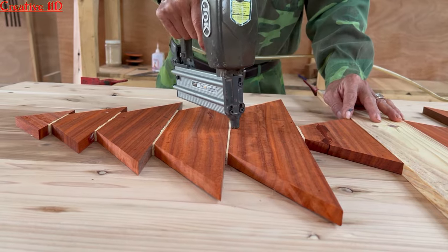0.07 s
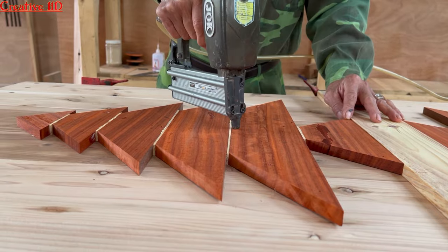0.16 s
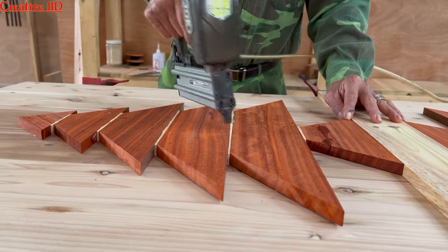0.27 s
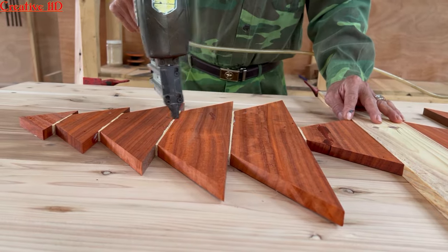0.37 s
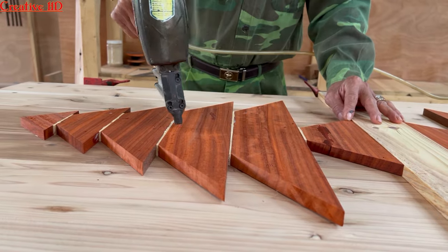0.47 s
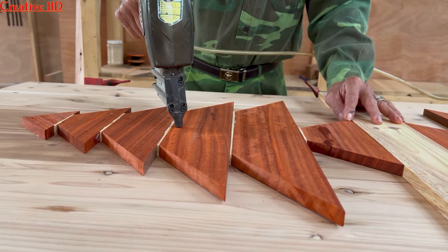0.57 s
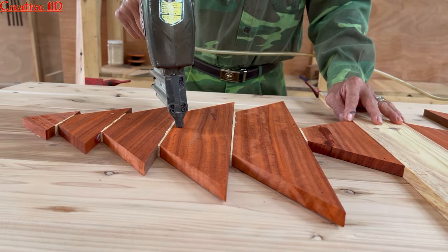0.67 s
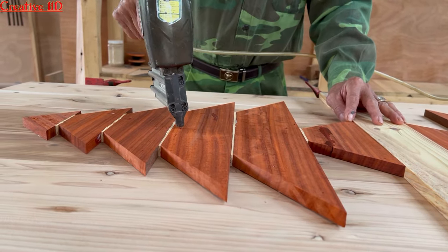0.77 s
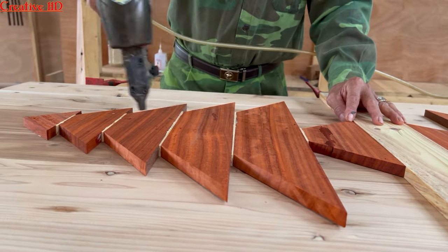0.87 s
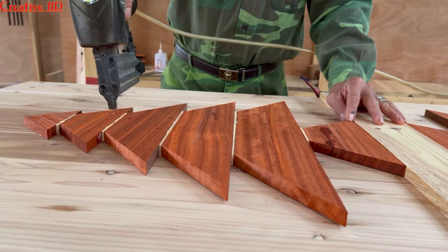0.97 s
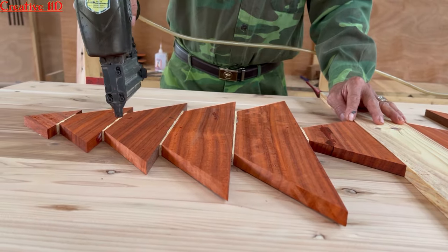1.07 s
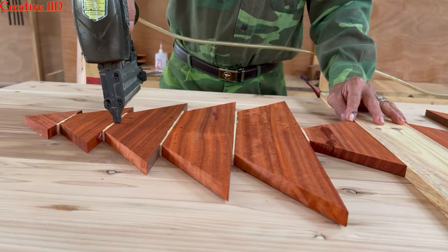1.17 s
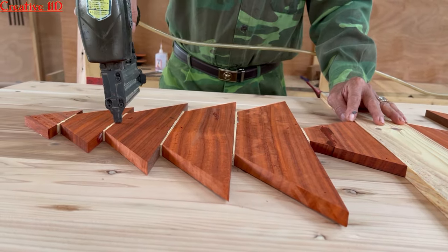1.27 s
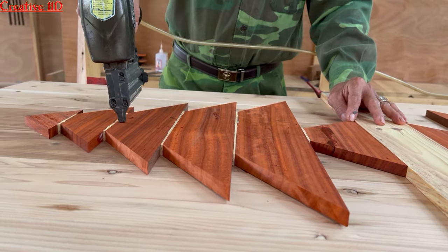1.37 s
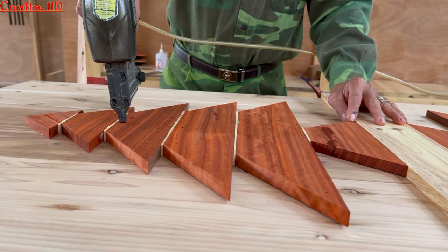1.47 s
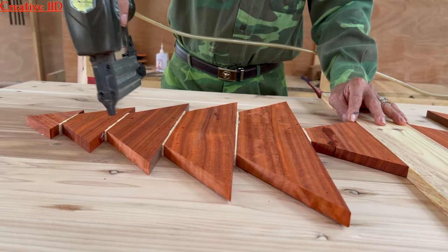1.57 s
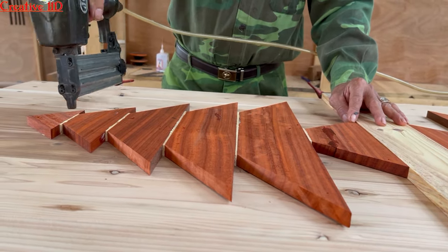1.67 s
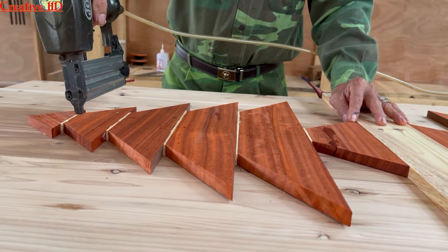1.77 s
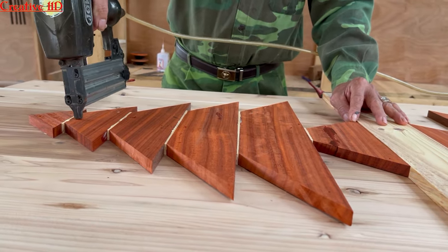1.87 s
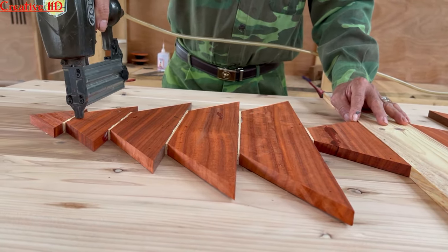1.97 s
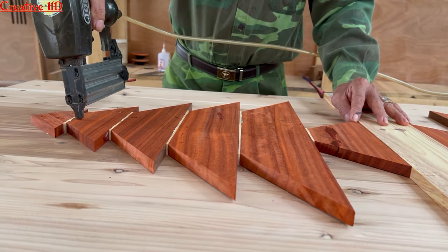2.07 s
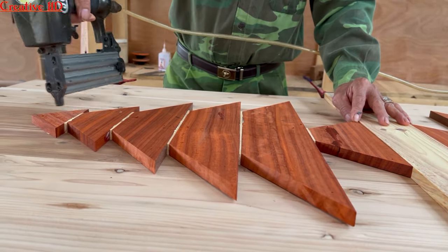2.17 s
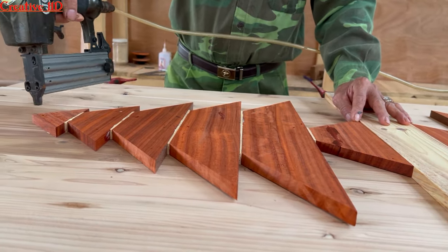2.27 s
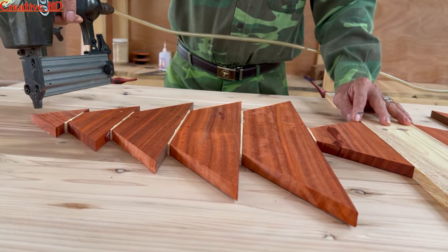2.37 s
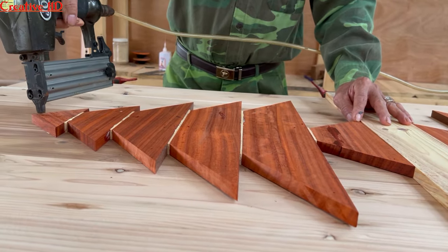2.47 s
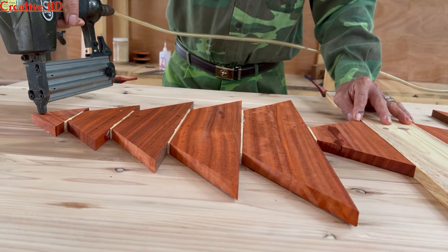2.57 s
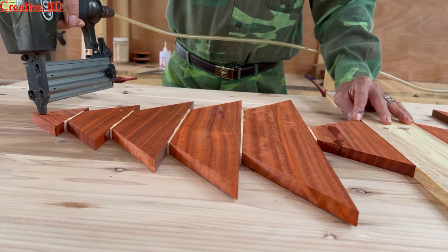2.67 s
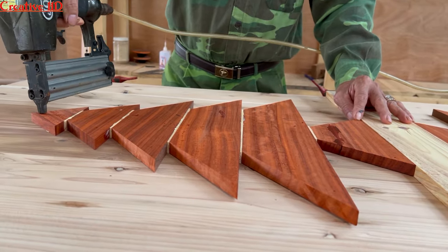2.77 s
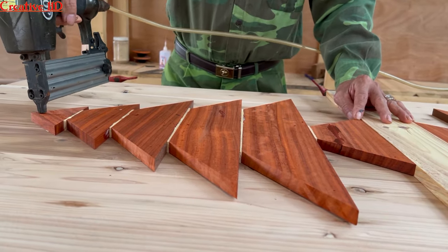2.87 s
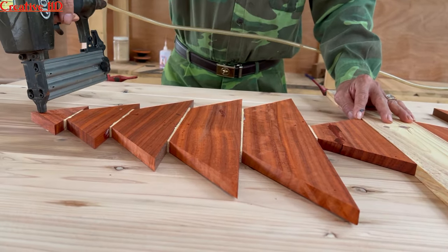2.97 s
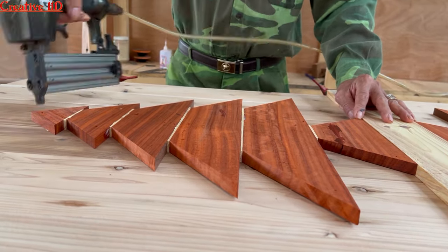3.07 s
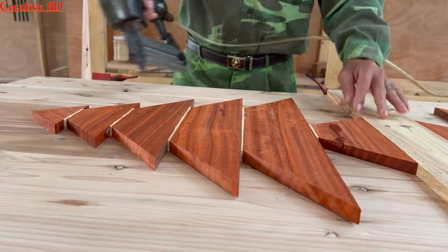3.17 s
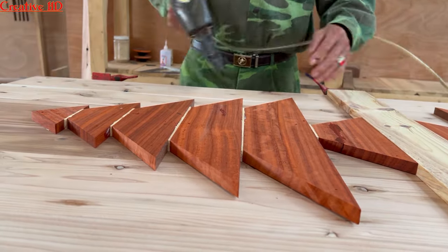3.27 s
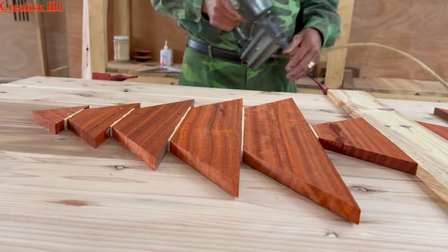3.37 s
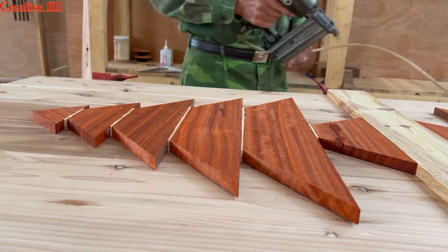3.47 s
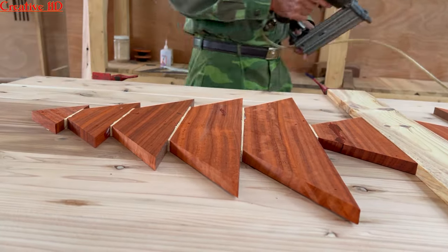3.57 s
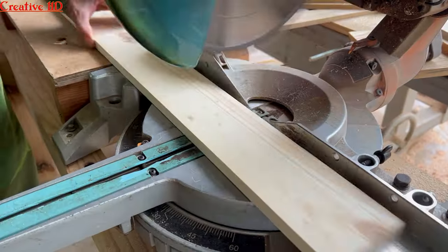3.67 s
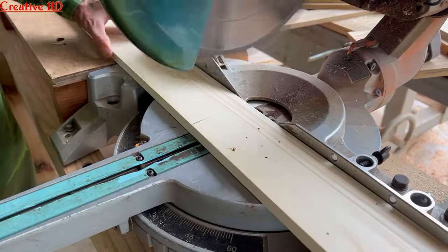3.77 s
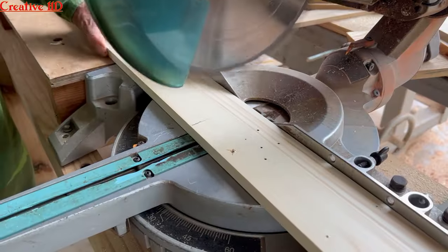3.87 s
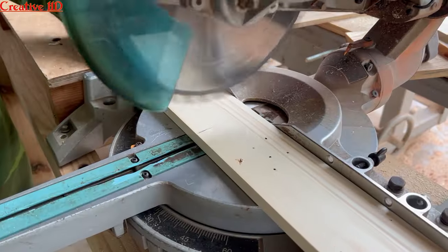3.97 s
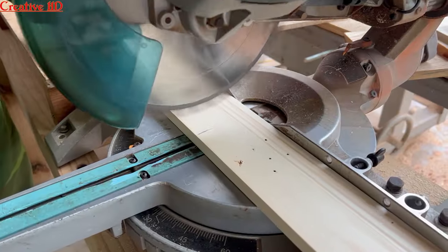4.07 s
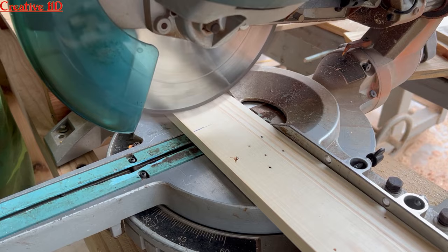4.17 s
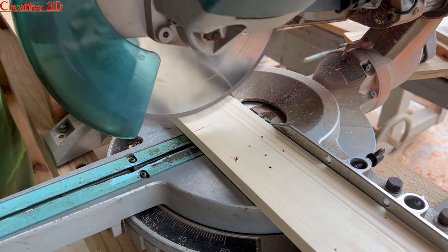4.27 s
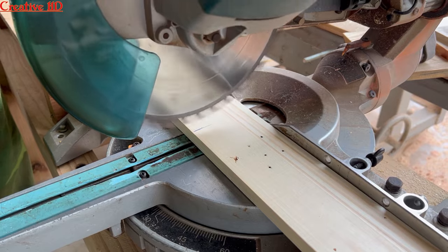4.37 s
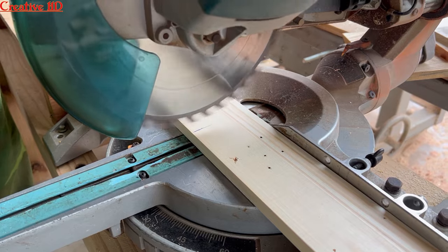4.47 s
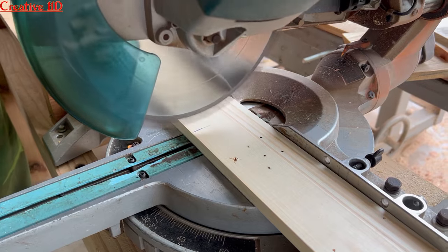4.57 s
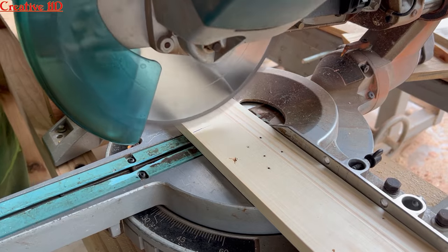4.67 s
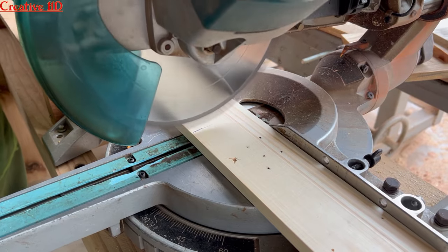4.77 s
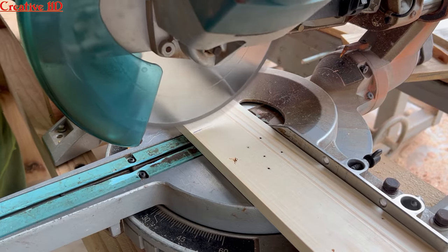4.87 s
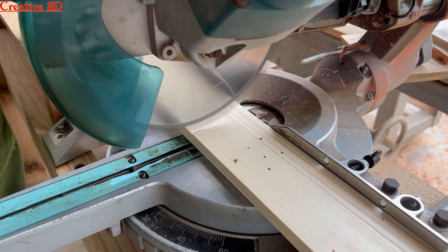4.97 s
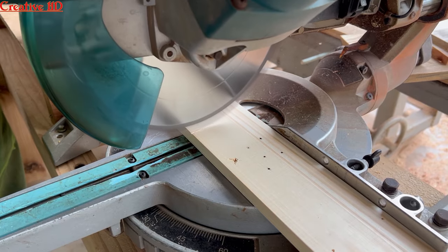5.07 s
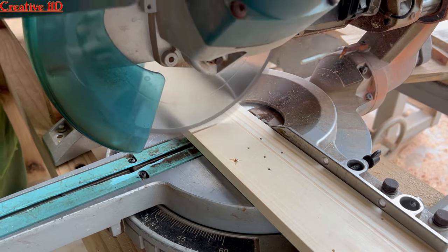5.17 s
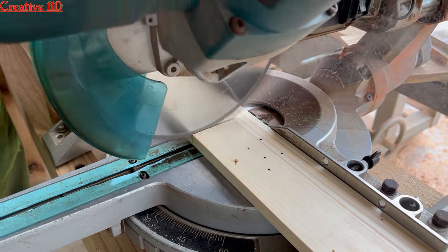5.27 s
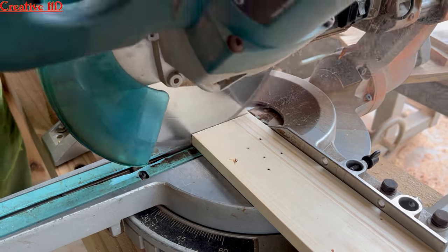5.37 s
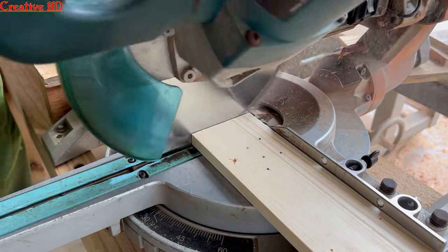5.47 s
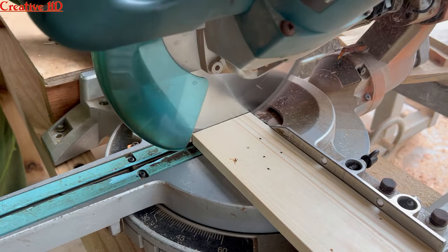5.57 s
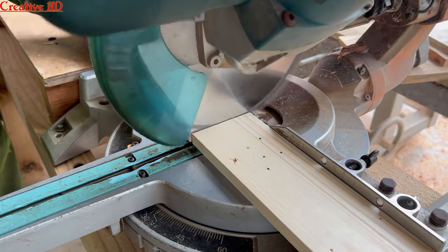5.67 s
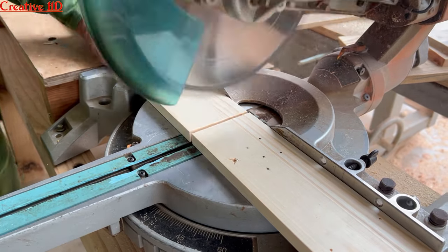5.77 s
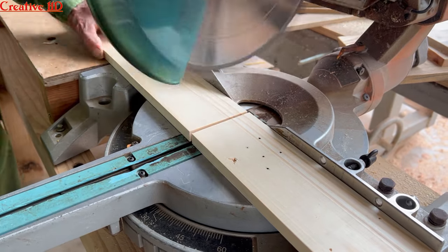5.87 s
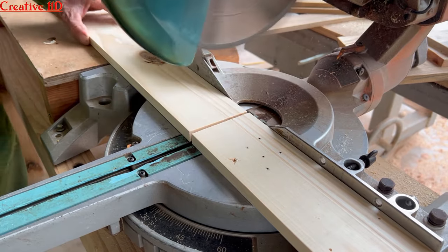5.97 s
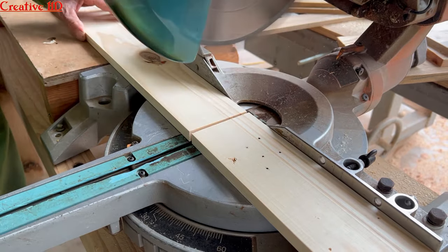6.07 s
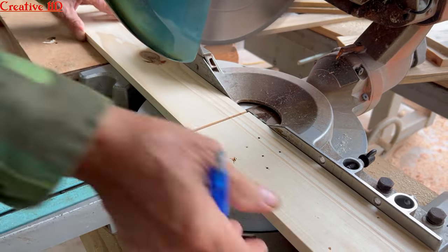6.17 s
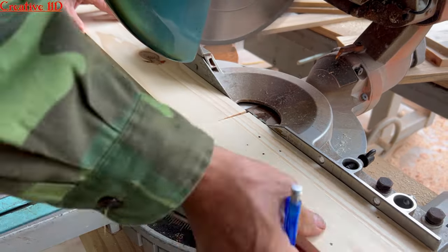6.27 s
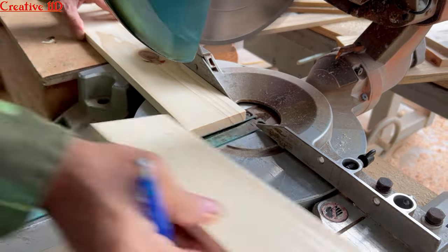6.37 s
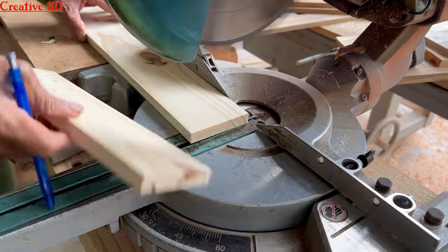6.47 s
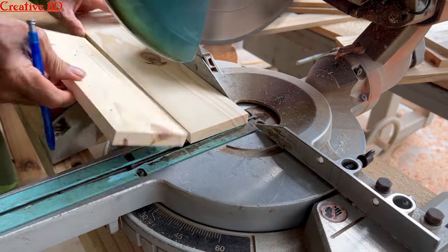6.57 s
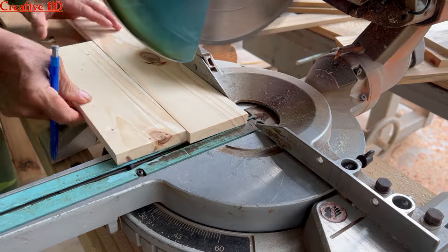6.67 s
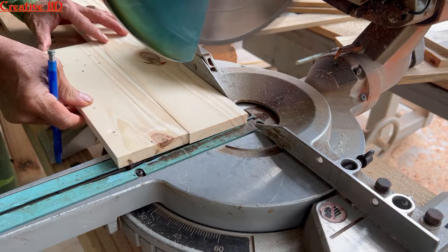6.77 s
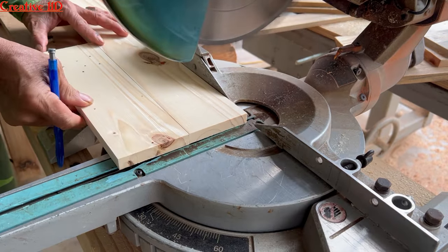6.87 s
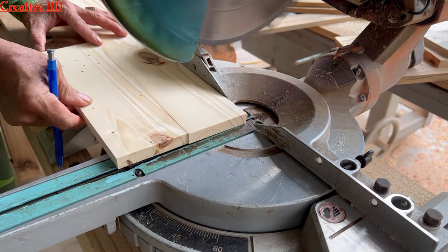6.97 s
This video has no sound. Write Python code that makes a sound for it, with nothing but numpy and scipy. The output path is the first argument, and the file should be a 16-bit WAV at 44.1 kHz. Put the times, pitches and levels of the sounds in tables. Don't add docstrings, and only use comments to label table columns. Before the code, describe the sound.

Close stereo phone pickup in a workshop with quiet background air and short reverberation. A pneumatic nailer fires at about 0.23, 0.79, 1.54, 2.08 and 3.04 s: a valve puff, a violent crack, then some 0.05 s later a bright exhaust burst and fading hiss, with low bench thuds and the tool dropping back. Soft wooden nose touches come between shots; very faint distant squeals appear around 0.5-1.5 s. At 3.67 s the place changes abruptly: a thin blade ring fades under small wooden ticks near 3.75 s. A switch clacks at 4.58 s and a mitre saw runs up to a piercing whine. Teeth meet wood at 5.05 s; the pitch sags slightly amid roaring, rasping hiss until 5.7 s. A clack at 5.8 s starts braking, the whine plunging and fading by about 6.4 s over faint blade ring. Pieces click and knock from 6.5 to 6.75 s, then quiet.

```python
import sys
import numpy as np
from scipy import signal
from scipy.fft import rfft, irfft, next_fast_len
from scipy.io import wavfile
from scipy.ndimage import uniform_filter1d, map_coordinates

SR = 44100
rng = np.random.default_rng(int(sys.argv[2]) if len(sys.argv) > 2 else 0)


def dump(signal):
    limited = np.clip(np.atleast_2d(signal).T, -1, 1)
    pcm = np.round(limited * 32767).astype(np.int16)
    wavfile.write(sys.argv[1], SR, pcm)


def amplitude_ratio(level_db):
    exponent = np.asarray(level_db, float) / 20
    return 10 ** exponent


N = 309565
T = np.arange(N) / SR
SCENE_CHANGE = 3.672
TOP_HZ = 15850
SWITCH_ON_S, CONTACT_S, THROUGH_S, BRAKE_S, STOP_S = 4.58, 5.05, 5.69, 5.786, 6.5
FREE_HZ = 5280

# start in seconds, puff in dB, leak in dB.
VALVES = [
    (0.219, -23, -27.5),
    (0.7756, -10.5, -28.5),
    (1.5285, -26.5, -29.5),
    (2.072, -20, -27.5),
    (3.02, -19, -28.5),
]
# start in seconds, peak in dB, rebound in dB.
BLOWS = [
    (.23, -5.5, -19),
    (0.7925, -2, -20.5),
    (1.5392, -5, -23),
    (2.082, -6, -21),
    (3.037, -3.5, -18),
]
# start in seconds, opening in dB, closing in dB, leak in dB.
EXHAUSTS = [
    (0.292, -7, -12, -37.5),
    (0.8319, -5.5, -8.5, -37.5),
    (1.594, -8, -8, -35.5),
    (2.1484, -7.5, -10, -34.5),
    (3.0987, -7.5, -8.5, -34),
]
# start in seconds, level in dB.
SEEPS = [
    (2.57, -68.5),
    (2.66, -69),
]
# delay after the event in seconds, body relative in dB, hold in seconds.
PUFF = (.0006, -5, .002)
BLOW = (.0006, -2, .0035)
REBOUND = (.011, 1, .005)
OPENING = (0.0013, -11.5, 0.0135)
SNAP = (0.00088, -4.5, 0.0024)
CLOSING = (.0125, -3.5, 0.0012)
# frequency in Hz, density in dB per Hz.
BLAST = [(1470, -33.5), (2500, -7.5), (4300, -6), (4990, -5.5), (8940, -4.5), (10600, -7), (11500, -1),
         (14700, -6.5), (16000, -10.5)]
BODY = [(180, -26), (300, -8.5), (999, -12), (1500, -14), (2300, -11), (3300, -15.5), (4300, -11),
        (6000, -27), (7800, -55.5), (13200, -120)]
LEAK = [(590, -35), (1000, -8.5), (1890, -7.5), (2680, -3), (3300, -5.5), (5200, -6), (7100, -13.5),
        (13300, 2.5), (16000, -7)]

# start in seconds, peak in dB.
STRIKES = [(.2345, -19), (.295, -20), (.7771, -17), (.794, -13), (.835, -15), (1.53, -37.5), (1.54, -24),
           (1.594, -21), (2.084, -11), (2.149, -13.5), (3.0214, -21.5), (3.037, -15.5), (3.099, -13.5)]
# start in seconds, peak in dB.
ROCKS = [
    (.343, -19),
    (.391, -22),
    (.879, -22.5),
    (1.626, -35),
    (1.639, -26.5),
    (2.118, -20),
    (2.209, -19),
    (3.155, -24),
]
# start in seconds, peak in dB.
LANDINGS = [
    (.4111, -16),
    (.922, -21.5),
    (1.706, -22),
    (2.2672, -14.5),
    (3.216, -16.5),
]
# softness in seconds, t60 in seconds, 1.25 times the last pitch in Hz.
STRIKE = (.001, .052, 95)
ROCK = (0.0041, 0.079, 95)
LANDING = (.001, 0.044, 51)

# start in seconds, peak in dB, click relative in dB.
TOUCHES = [
    (0.077, -29.5, -27),
    (0.575, -33.5, -30),
    (1.165, -26.5, -17.5),
    (1.896, -28, -28),
    (2.565, -46, -15.5),
    (3.497, -54, 0),
    (3.515, -43, -11.5),
]
# frequency in Hz, level in dB, t60 in seconds.
BOARD = [(300, -9, .17), (425, -1, .19), (515, 0, .13), (760, -5, .11), (860, -14, .1), (990, -17, .1),
         (1200, -14, .06)]
# start in seconds, peak in dB, pitch in Hz, click relative in dB.
TICKS = [(0.1704, -44.5, 2270, -19), (0.2207, -26, 1508, -3), (1.5291, -25, 7990, -5.5),
         (2.0707, -27, 7940, -6), (2.881, -53.5, 2400, -18.5), (3.516, -46.5, 790, -29.5),
         (3.53, -47.5, 790, -30), (3.635, -53, 1830, -13.5), (3.752, -36.5, 1030, -22),
         (3.7555, -32, 2610, -24), (3.7691, -34, 2150, -25.5), (3.773, -39.5, 704, -24.5),
         (3.78, -36, 2240, -19.5), (3.909, -43.5, 2275, -17.5), (4.174, -57.5, 7000, -3),
         (4.43, -60.5, 7950, -4.5), (4.466, -67, 8000, -4.5), (4.488, -67, 7000, -3.5),
         (4.535, -47, 1035, -0.5), (4.583, -25, 1520, -19.5), (4.591, -20, 1440, -25),
         (5.805, -18, 1340, -15), (5.811, -17.5, 1370, -15), (5.807, -24.5, 9700, -30),
         (5.815, -28, 9840, -31), (6.508, -39, 7680, -9), (6.526, -39.5, 2980, -2),
         (6.5393, -39, 3920, -12), (6.544, -46, 1290, -14), (6.561, -42.5, 3960, -3),
         (6.6384, -27, 3500, -19), (6.659, -36.5, 1120, -12.5), (6.665, -35.5, 780, -25),
         (6.676, -35, 1210, -25.5), (6.691, -36, 1100, -23), (6.673, -27.5, 2780, -27.5),
         (6.685, -30, 1520, -31.5), (6.698, -34.5, 770, -15.5), (6.7315, -31, 3760, -14),
         (6.733, -34.5, 1360, -23.5)]

# multiple of the main whine, level in dB, unsteadiness 0-1.
DRIVING = [(1, -1, .022), (2, 2.5, .026), (3, -4, .025)]
# multiple, level in dB, unsteadiness 0-1, heard from Hz, heard to Hz.
BRAKING = [(1, -37, .03, 1200, 3300), (2, -34, .02, 2750, 8500), (2, -40, .03, 1930, 2080),
           (4, -42, .01, 2600, 13000), (8, -41, .006, 4400, 5500)]
# frequency in Hz, gain in dB.
HOUSING = [(600, -22), (1400, -1), (2000, 5), (2500, -2), (3100, -5), (3750, 5), (4200, -1), (4800, 5),
           (5250, 3), (5800, -4), (6600, 3), (7800, -7), (8700, -1), (10000, -7), (12500, -5), (14800, 1)]
# frequency in Hz, gain in dB.
GUARD = [(600, -4), (1250, 0), (1650, -4), (2000, 2), (2400, -10), (2850, 0), (3250, -7), (3650, 7),
         (4900, 3), (5700, -9), (6600, -1), (8000, -3), (11000, -6), (16000, -20)]
# level in dB, dB per octave of speed when driven, the same when braking,
# change once through the wood in dB, change once braked in dB, gain at full bite in dB.
ROAR_LAW = (-28.5, 4, 10, 0, -1, 2.5)
CUT_LAW = (-24, 7.5, 8.5, -3.5, -1.5, 2.5)
WHINE_LAW = (3, 0, -20, 0, -1)
# peak in seconds, peak in dB, rise in dB per second, fall in dB per second.
GROWL = [
    (4.6, -54.5, 302.7, 30),
    (4.7, -34, 40, 90),
]
# as the growl, then frequency in Hz.
RASP = [
    (4.98, -28.5, 70, 61, 3730),
    (5.17, -31.5, 54, 60, 5800),
    (5.3, -33, 40, 35, 5250),
    (5.65, -24, 54, 250, 5250),
    (5.53, -35, 120, 120, 8750),
]
# frequency in Hz, level in dB.
SINGING = [(4883, -30), (5281, -38), (6460, -33), (6724, -44), (7257, -40), (8979, -42), (9771, -42),
           (9900, -43), (10347, -41), (10541, -41), (11908, -42), (12016, -44), (12796, -39), (13324, -45),
           (13609, -44), (15434, -40), (15720, -41)]
# frequency in Hz, density in dB per Hz.
ROAR = [(120, -55), (200, -23), (418, -16.5), (512, -15), (594, -16), (665, -8.5), (1070, 0), (1800, -8.5),
        (3000, -7.5), (3900, -18.5), (6600, -120)]
CUT = [(880, -44.5), (1500, -10), (1810, -20), (2740, -8.5), (4000, -3.5), (5020, 1), (5880, -4),
       (6630, -7.5), (8080, -9.5), (10100, -8.5), (11200, -10), (12400, -11.5), (16000, -14)]

# frequency in Hz, level in dB.
RINGING = [(2250, -60), (2277, -56.5), (3042, -67.5), (3079, -71.5), (3618, -80), (3801, -72.5),
           (3930, -77), (4091, -74), (4151, -74.5), (6406, -99), (6438, -103), (6471, -101), (6821, -107),
           (7887, -118)]
# frequency in Hz, level in dB.
RINGING_LATE = [(1880, -68.5), (2627, -74.5), (3618, -67.5), (3898, -67.5), (4054, -70), (4145, -64),
                (6508, -71.5), (6546, -74), (7359, -83.5), (8210, -83.5)]
# frequency in Hz, level in dB.
DRONE = [(150, -2), (175, -4), (200, -1.5)]
# peak in seconds, peak in dB, rise in dB per second, fall in dB per second.
EARLY_RING = [
    (3.672, -56, 1, 9.5),
    (3.672, -61.5, 1, 5.5),
]
LATE_RING = [
    (5.9, -56.5, 150, 15),
    (6.2, -52, 12, 20),
]
HUM = [
    (4.9, -49, 26.6, 36),
    (5.97, -50, 44.5, 14),
    (6.4, -79, 36.13, 17),
]

# start in seconds, end in seconds, pitch in Hz, glide in Hz per second, level in dB.
SQUEALS = [
    (0.49, 0.717, 1190, -170, -67.5),
    (0.589, 0.706, 2370, -700, -71),
    (0.898, 1.527, 2680, 570.5, -75.5),
]
# peak in seconds, peak in dB, rise in dB per second, fall in dB per second.
BENCH_SWELLS = [
    (.5, -64, 1, 0.96),
    (1.5, -65, 35, 20),
]
SAW_SWELLS = [
    (3.67, -57.5, 1, 1),
    (5.2, -51, 26, 2.6),
    (6.8, -53, 73, 22.6),
]
# frequency in Hz, density in dB per Hz.
BENCH_AIR = [(35, -62.5), (60, -24.5), (90, -8), (200, -3.5), (320, -13.5), (520, -11.5), (850, -15),
             (1600, -21.5), (3000, -21.5), (7000, -35.5), (12500, -27.5), (16000, -33.5)]
SAW_AIR = [(47, -28), (80, 0), (156, -0.5), (404, -18), (615, -14.5), (751, -20), (2270, -17),
           (3240, -22.5), (4050, -19), (13100, -46), (16000, -54)]
# frequency in Hz, t60 in seconds.
SHOP = [(100, 0.96), (500, 0.35), (2000, 0.45), (6000, 0.21), (14000, 0.11)]
# frequency in Hz, then likeness 0-1, left-right in dB, or left lead in radians.
AT_BENCH = [
    [(100, 0.99), (600, 1), (2000, 0.88), (5000, 0.36), (15000, 0.25)],
    [(60, -0.5), (150, -1), (380, -0.5), (950, -2), (2380, -3), (5980, -2.5), (15000, -4)],
    [(0, 0), (2500, 0.5), (5680, -1.3), (8010, 1), (12300, -3), (14700, -9), (16700, -3.5)],
]
AT_SAW = [
    [(100, .98), (600, .85), (2500, .85), (4000, .12), (5200, .55), (8000, .58), (10000, .45), (15000, .5)],
    [(100, -1), (700, -3.5), (1400, -5), (2750, -.5), (4100, 1), (5500, -1), (6400, -5), (8200, -4.5), (10000, -10), (12000, -6), (15000, -4.5)],
    [(0, 0), (700, -.35), (3100, -.25), (4000, -3), (4800, -4), (6500, -6.2), (9000, -6.8), (12400, -6), (14600, -7.7)],
]


def air():
    sharp, body, leak, valve = np.zeros((4, N))
    t = T[:SR // 2]
    bursts = [(s, db, PUFF) for s, db, _ in VALVES]
    for s, db, rebound_db in BLOWS:
        bursts += [(s, db, BLOW), (s, rebound_db, REBOUND)]
    for s, db, closing_db, _ in EXHAUSTS:
        bursts += [(s, db, OPENING), (s, db + 0.5, SNAP), (s, closing_db, CLOSING)]
    for s, db, (after, body_db, hold) in bursts:
        shape = (1 - np.exp(-t / 0.00027)) * amplitude_ratio(-60 * np.clip(t - hold, 0, 1) / 0.013)
        add(sharp, s + after, amplitude_ratio(db - 13) * shape)
        add(body, s + after, amplitude_ratio(db + body_db - 7.5) * shape)

    for s, *_, db in VALVES + EXHAUSTS + SEEPS:
        add(leak, s, amplitude_ratio(db - 60 * t / .4))
    lead_s = 0.012
    to_go = lead_s - T[:round(lead_s * SR)]
    for s, _, db in VALVES:
        add(leak, s - lead_s, amplitude_ratio(db - 11 - 2000.5 * to_go))
        add(valve, s, amplitude_ratio(db - 1.5 - 60 * t / .09))

    flutter = amplitude_ratio(2.6 * wobble(700))
    jets = flutter * (sharp * noise(BLAST) + body * noise(BODY))
    valve_hiss = valve * tones([(8400, 0)], width_hz=1600)
    return jets + leak * noise(LEAK, patchy_db=2.7) + valve_hiss


def bench():
    top, t = np.zeros(N), T[1:SR // 4]
    for rows, (soft, t60, hz) in [(STRIKES, STRIKE), (ROCKS, ROCK), (LANDINGS, LANDING)]:
        pitch = np.hypot(1.2 / (t + 2.0 * soft - .0017), .8 * hz)
        sweep = np.cos(2 * np.pi * np.cumsum(pitch) / SR + 0.94)
        swelling = (t / soft) ** 2 / (1 + (t / soft) ** 2)
        decay_db = 22 * t / t60 + 60 * (t / (1.2 * t60)) ** 2
        for s, db in rows:
            add(top, s, amplitude_ratio(db - decay_db) * swelling * sweep)
    hz, width_hz = 103, 7
    resonance = lambda f: 1j * f * width_hz / (hz * hz - f * f + 1j * f * width_hz)
    return top + amplitude_ratio(-9.0) * filtered(top, resonance)


def touches():
    out, t = np.zeros(N), T[:SR // 4]
    for s, db, click_db in TOUCHES:
        ring = 0
        for hz, level, t60 in BOARD:
            mode_hz = hz * rng.normal(1, .02)
            ring = ring + amplitude_ratio(level + rng.normal(0, 2) - 60 * t / t60) * np.sin(2 * np.pi * mode_hz * t)
        grit = rng.standard_normal(len(t))
        wood = unit(peak(peak(grit, 600, .8), 450, 1.9))
        thud = amplitude_ratio(db - 8.0) * (1 - np.exp(-t / 0.0017)) * ring
        scrape = amplitude_ratio(db - 12 - 60 * t / 0.15) * (1 - np.exp(-t / 0.0022)) * wood
        add(out, s, thud + scrape)
        sweep = np.cumsum(np.hypot(2.9 / (t + .0008), 450)) / SR
        add(out, s - .001, amplitude_ratio(db - 12.5 - 60 * t / 0.023) * np.sin(2 * np.pi * sweep))
        add(out, s, amplitude_ratio(db + click_db + 8 - 60 * t / 0.025) * peak(grit, 1700, .8))
    return out


def ticks():
    out, t = np.zeros(N), T[:SR // 12]
    for s, db, hz, click_db in TICKS:
        grit = rng.standard_normal(len(t))
        puff = amplitude_ratio(db - 7.5 - 60 * t / 0.025) * unit(peak(peak(grit, hz, .45), hz, .9))
        click = amplitude_ratio(db + click_db + 2.0 - 60 * t / 0.02) * np.diff(grit, prepend=0)
        clack = amplitude_ratio(db - 1.5 - 60 * t / .014) * np.sin(2 * np.pi * hz * t)
        add(out, s, puff + click + clack)
    return out


def motor():
    bite = np.exp(-((T - 5.39) / .235) ** 2)
    driven = FREE_HZ / (1 + np.exp((4.828 - T) / .134)) - 325 * bite
    crawl_hz = 250
    braked = crawl_hz + (FREE_HZ - crawl_hz) * np.exp(-np.clip(T - BRAKE_S, 0, 9) / .153)
    return np.clip(np.minimum(driven, braked), 1, None), bite


def driven_whine(hz, steady, shaky):
    orders = []
    for k, db, rough in DRIVING:
        level = amplitude_ratio(db + along(HOUSING, k * hz) + 2.0 * wobble(40) + 1.2 * wobble(14))
        orders.append(level * (k * hz < TOP_HZ) * np.sin(2 * np.pi * k * (steady + rough * shaky)))
    first, second, third = orders
    loaded = amplitude_ratio(4 * step(CONTACT_S, .04))
    whine = loaded * first + step(4.66, .06) * second + step(4.81, 0.08) * third
    return (1 - step(BRAKE_S, .02)) * whine * step(SWITCH_ON_S + .04, 0.13)


def braking_whine(hz, steady, shaky):
    out = 0
    for k, db, rough, low_hz, high_hz in BRAKING:
        below_db = np.clip(120 * np.log2(low_hz / (k * hz)), 0, 11)
        above_db = np.clip(150 * np.log2(k * hz / high_hz), 0, 99)
        fade_db = 45 * np.clip(T - 5.95, 0, 9)
        level = amplitude_ratio(db + along(GUARD, k * hz) - fade_db + 2.2 * wobble(50) - below_db - above_db)
        out = out + level * np.sin(k * 2 * np.pi * (steady + rough * shaky))
    return step(BRAKE_S, .02) * out


def load_gain(hz, bite, level_db, up, down, out_db, off_db, bite_db):
    speed_db = np.where(T < BRAKE_S, up, down) * np.log2(hz / FREE_HZ)
    released_db = out_db * step(THROUGH_S, .025) + off_db * step(BRAKE_S + 0.023, .025)
    return amplitude_ratio(level_db + speed_db + released_db + bite_db * bite)


def saw():
    hz, bite = motor()
    through = step(THROUGH_S, .025)
    steady = np.cumsum(hz) / SR
    shaky = np.cumsum(hz * wobble(1100) * (1.6 - .6 * step(CONTACT_S, .1))) / SR
    whine = load_gain(hz, bite, -28.5, *WHINE_LAW) * driven_whine(hz, steady, shaky)

    running = np.clip((T - 4.8) / 0.3, 0, 1) * (1 - step(BRAKE_S, .02))
    teeth = amplitude_ratio(-34.0 + 2.5 * wobble(33)) * (T > 5.14) * (1 - .3 * through) * np.sin(3 * np.pi * steady)
    shaft = amplitude_ratio(-41 + 2.5 * wobble(20)) * np.sin(np.pi * steady / 4) * (1 - step(5.45, .2))
    singing = amplitude_ratio(-21.5 - 218 * (T - 5.39) ** 2) * (1 - through) * tones(SINGING, width_hz=16.0)
    growl = swell(GROWL) * tones([(1445, 0)], width_hz=200)
    for *row, band_hz in RASP:
        growl = growl + swell([row]) * tones([(band_hz, 0)], width_hz=120)
    lines = whine + braking_whine(hz, steady, shaky) + running * (teeth + shaft) + singing + growl

    grit = amplitude_ratio(0.19 * wobble(300) + 0.36 * wobble(18))
    jolt = amplitude_ratio(-29 - 60 * np.abs(T - SWITCH_ON_S) / 0.045)
    roar = load_gain(hz, bite, *ROAR_LAW) * noise(ROAR, patchy_db=1.5)
    cut = (load_gain(hz, bite, *CUT_LAW) + jolt) * noise(CUT, patchy_db=3.0)
    on = step(SWITCH_ON_S - .002) * (1 - step(STOP_S - .3, .3))
    return on * (grit * (roar + cut) + lines * np.array([[1.05], [.7]]))


def chime(lines, damping):
    modes = [amplitude_ratio(db - damping * hz * (T - 6.0)) * np.sin(2 * np.pi * hz * T) for hz, db in lines]
    sides = np.array([np.ones(len(lines)), (-1.) ** (np.arange(len(lines)) // 2)])
    return unit((sides @ modes) * (T > SCENE_CHANGE))


def blade():
    early = swell(EARLY_RING) * (T > SCENE_CHANGE) * (T < SWITCH_ON_S)
    late = swell(LATE_RING)
    ring = early * amplitude_ratio(-8 + 1.2 * wobble(8)) * chime(RINGING, damping=0.0036)
    ring = ring + late * amplitude_ratio(0.5) * tones(RINGING_LATE, width_hz=15)
    hum = swell(HUM) * (T > SWITCH_ON_S) * tones(DRONE, width_hz=7)
    hiss = noise(CUT)
    dull = filtered(hiss, lambda hz: 1 / (1 + (hz / 6130) ** 0.86))
    wash = early * amplitude_ratio(8.0 - 15.3 * (T - SCENE_CHANGE)) * dull + late * amplitude_ratio(-2.5) * hiss
    return (ring + hum) * np.array([[1.], [.8]]) + wash


def squeals():
    out = 0
    for start, end, hz, glide, db in SQUEALS:
        fade_db = 500 * np.clip(start - T, 0, 1) + 150 * np.clip(T - end, 0, 1)
        pitch = hz + glide * (T - start) + (hz / 90) * wobble(90)
        level = amplitude_ratio(db - fade_db + 2.0 + 2.5 * wobble(61))
        out = out + level * np.sin(2 * np.pi * np.cumsum(pitch) / SR)
    return out


def floor():
    first = swell(BENCH_SWELLS) * amplitude_ratio(1.1 * wobble(3.1)) * noise(BENCH_AIR, patchy_db=2.0)
    second = swell(SAW_SWELLS) * amplitude_ratio(0.3 * wobble(6)) * noise(SAW_AIR, patchy_db=2.0)
    return np.where(T < SCENE_CHANGE, first, second)


def shop(x):
    hz, t, z = signal.stft(rng.standard_normal((2, SR)), SR, nperseg=256)
    tail = signal.istft(z * amplitude_ratio(-60 * t / along(SHOP, hz)[:, None]), SR, nperseg=256)[1]
    tail = tail / np.linalg.norm(tail[0])
    delayed = np.pad(x, (300, 0))[None]
    return signal.fftconvolve(delayed, tail, axes=1)[:, :N]


def ports(pair, place):
    alike, balance, lead = place
    turn = lambda hz: np.arccos(np.clip(along(alike, hz), -1, 1)) / 2
    mid, side = filtered(pair, lambda hz: np.array([np.cos(turn(hz)), np.sin(turn(hz))]))

    def offset(hz):
        log_ratio = along(balance, hz) * np.log(10) / 20 + 1j * along(lead, hz)
        return np.exp(np.array([[.5], [-.5]]) * log_ratio)

    return filtered(np.array([mid + side, mid - side]), offset)


def noise(spectrum, patchy_db=2.5):
    re, im = rng.standard_normal((2, 2, 257, N // 256 + 3))
    field = rng.standard_normal(re.shape[1:])
    field = uniform_filter1d(uniform_filter1d(field, 5, 0), 8, 1)
    pair = signal.istft((re + 1j * im) * amplitude_ratio(patchy_db * unit(field)), nperseg=512)[1][:, :N]
    return unit(filtered(pair, lambda hz: amplitude_ratio(along(spectrum, hz))))


def tones(lines, width_hz):
    comb = lambda f: sum(amplitude_ratio(db) * np.exp(-((f - hz) / width_hz) ** 2) for hz, db in lines)
    return unit(filtered(rng.standard_normal((2, N)), comb))


def swell(rows):
    power = 0
    for s, db, rise, fall in rows:
        power = power + amplitude_ratio(db - rise * np.clip(s - T, 0, 9) - fall * np.clip(T - s, 0, 9)) ** 2
    return np.sqrt(power)


def step(s, width=0.0049):
    return np.clip((T - s) / width, 0, 1)


def wobble(rate):
    return map_coordinates(rng.standard_normal(int(N * rate / SR) + 4), [T * rate])


def peak(x, hz, q):
    return signal.lfilter(*signal.iirpeak(hz, q, SR), x)


def filtered(x, response):
    m = next_fast_len(N + 8192)
    return irfft(rfft(x, m) * response(np.fft.rfftfreq(m, 1 / SR)), m)[..., :N]


def along(points, hz):
    f, v = np.transpose(points)
    return np.interp(np.log(hz + 1), np.log(f + 1), v)


def unit(x):
    return x / np.sqrt(np.mean(x ** 2) + 1e-20)


def add(track, s, piece):
    i = round(s * SR)
    track[..., i:i + piece.shape[-1]] += piece[..., :N - i]


def scene():
    jets, thumps, small = air(), bench(), touches() + ticks()
    close = jets + (thumps + small + squeals()) * np.array([[1.], [.4]])
    wet = shop(amplitude_ratio(-17.5) * jets[0] + amplitude_ratio(-36.5) * thumps + amplitude_ratio(-11.0) * small)
    sound = close + wet + saw() + blade() + floor()
    return np.where(T < SCENE_CHANGE, ports(sound, AT_BENCH), ports(sound, AT_SAW))


def low_pass(x):
    return signal.sosfilt(signal.butter(12, 17140, fs=SR, output="sos"), x)


def record(dry):
    bass_cut = filtered(dry, lambda hz: 1 / (1 + (30 / (hz + 1)) ** 4))
    squeezed = bass_cut / (1 + np.abs(bass_cut / .95) ** 4) ** (1 / 4)
    band = filtered(squeezed, lambda hz: np.where(hz < TOP_HZ, 1, amplitude_ratio(-38) * (hz < 17100)))
    return low_pass(band)


dry = scene()
out = record(dry)
dump(out)
```